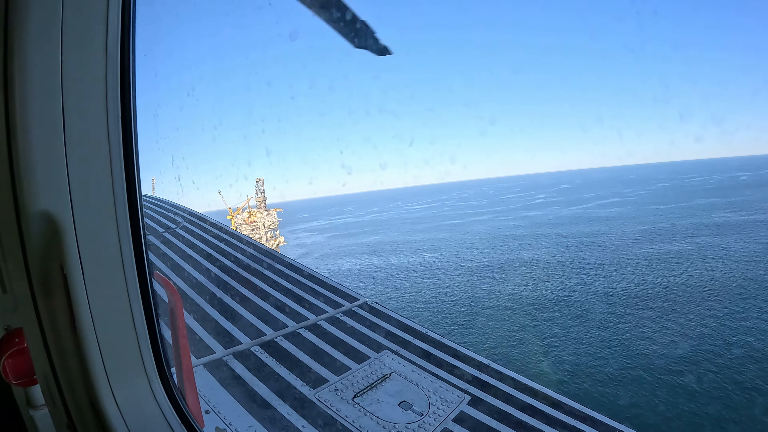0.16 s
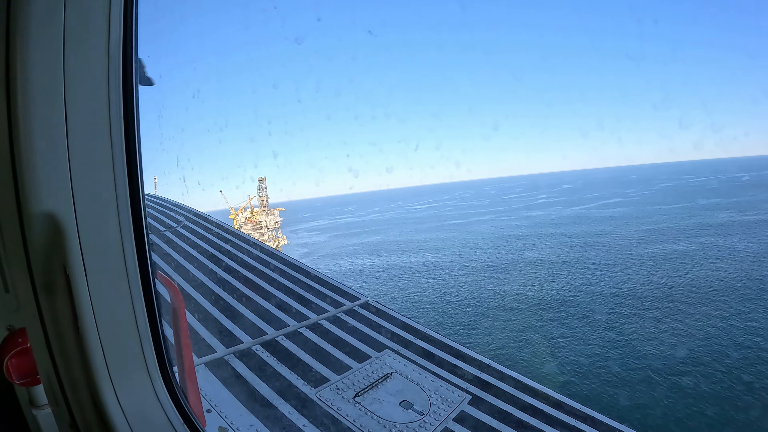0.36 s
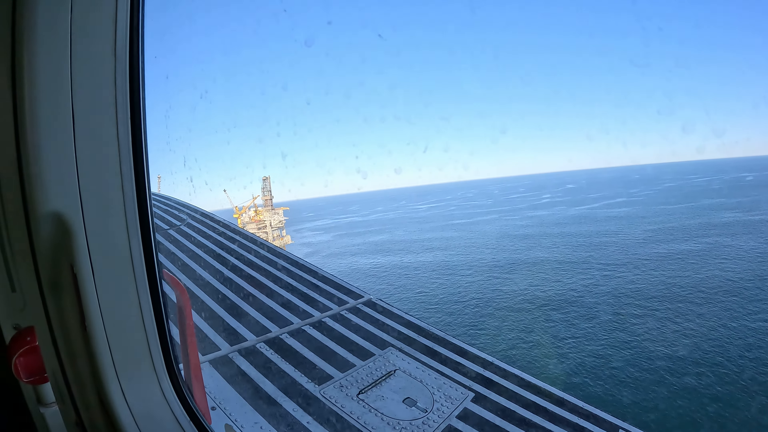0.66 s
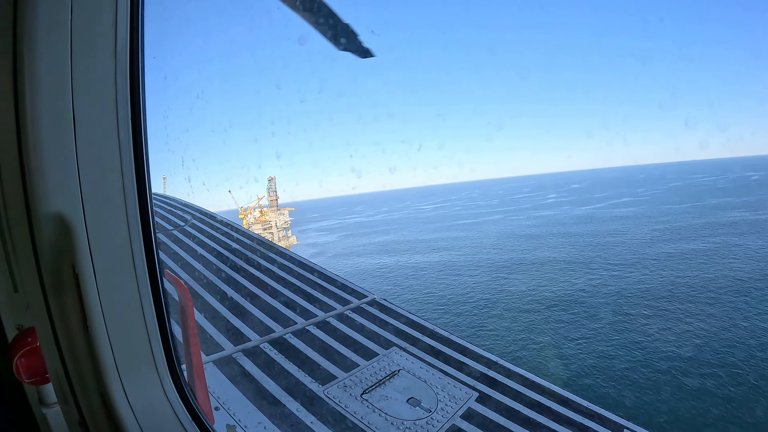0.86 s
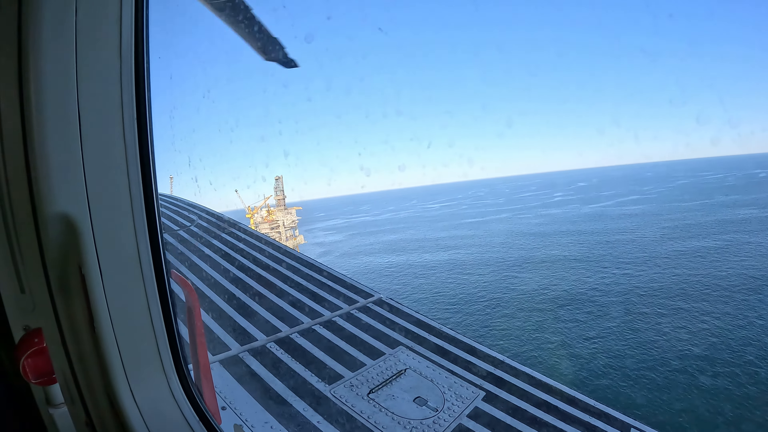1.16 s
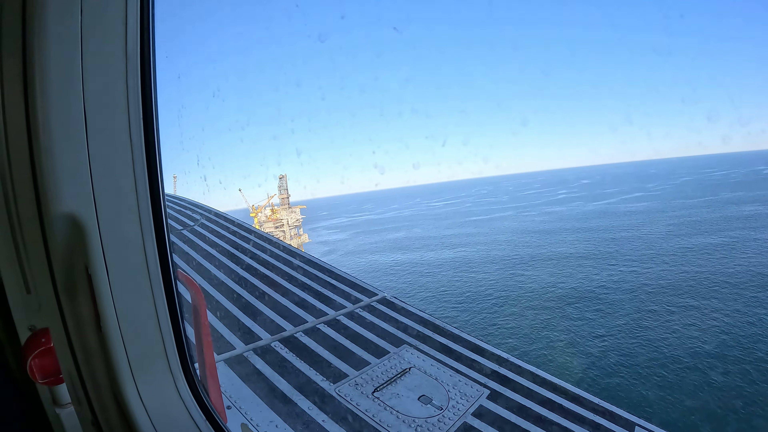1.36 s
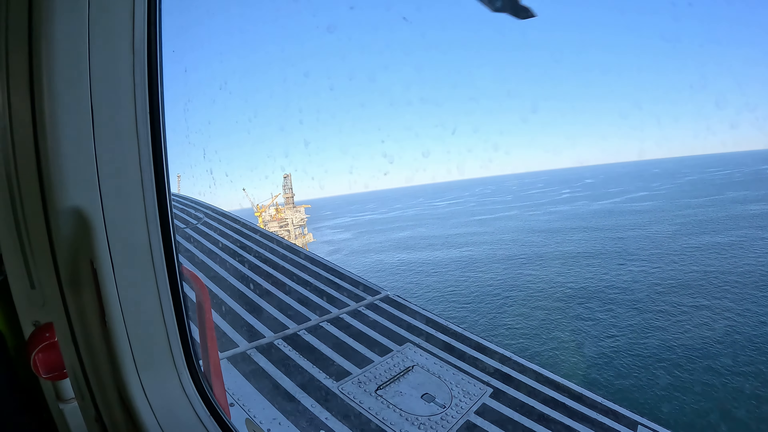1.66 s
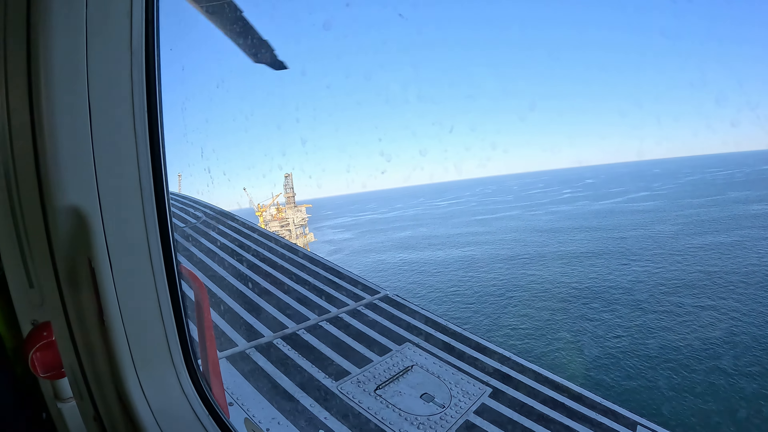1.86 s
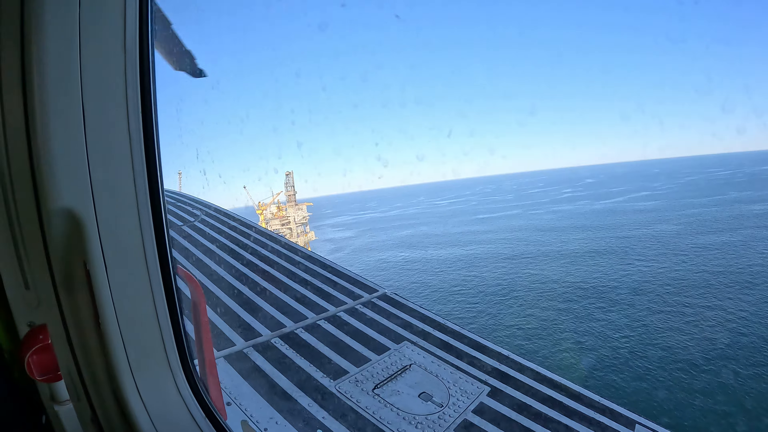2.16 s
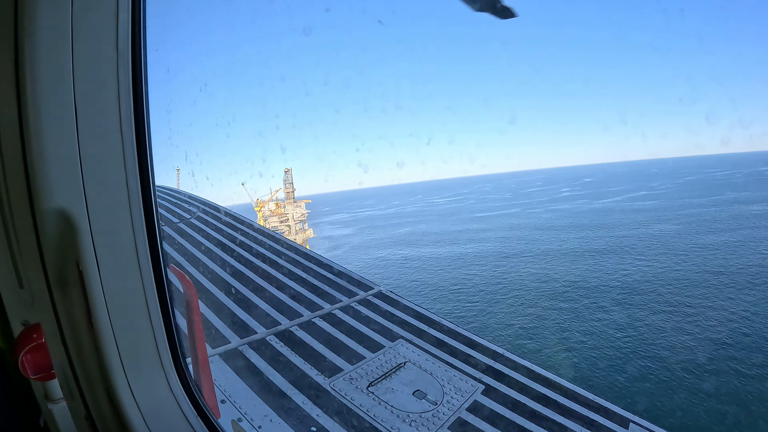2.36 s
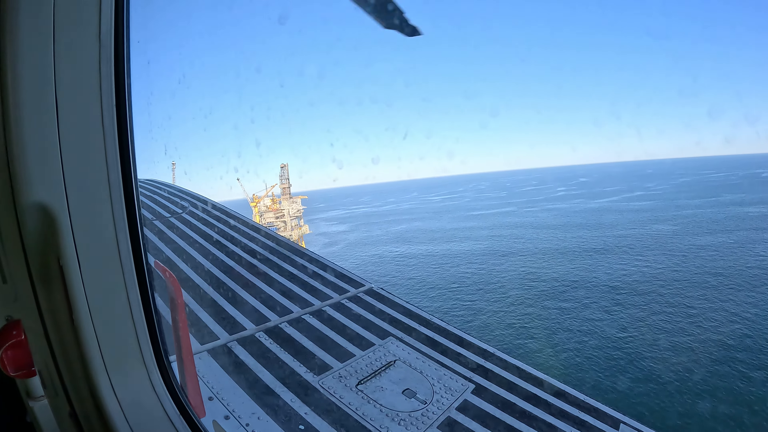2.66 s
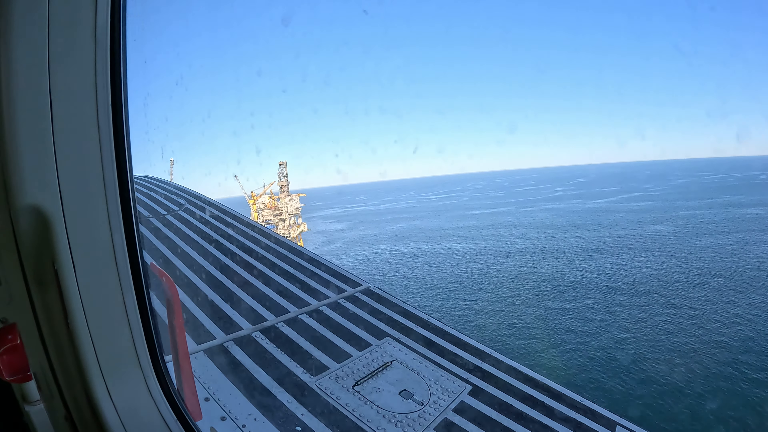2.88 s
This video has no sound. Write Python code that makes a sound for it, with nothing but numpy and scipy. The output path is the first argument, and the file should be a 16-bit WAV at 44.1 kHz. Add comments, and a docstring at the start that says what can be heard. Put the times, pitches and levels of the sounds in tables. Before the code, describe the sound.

A helicopter in steady flight, heard from inside the cabin. A deep, throbbing rotor hum and a broad engine roar run throughout, with quick, light blade swishes and gear whine. A faint, thin whistle creeps in about halfway.

```python
"""The rotors of a four-bladed helicopter in steady flight, heard from inside the cabin.
Main and tail rotor send pressure pulses through the hull, making a deep hum. Engines and airflow add a
broad roar, coloured by the cabin, and every passing blade lifts its treble in a short, gritty swish.
Gears whine and an engine whistles faintly above it. A gain control gently evens out the level."""
import sys
import numpy as np
from scipy import signal
from scipy.fft import rfft, irfft, next_fast_len
from scipy.io import wavfile

SR = 44100
rng = np.random.default_rng(int(sys.argv[2]) if len(sys.argv) > 2 else 0)


def pcm_store(signal):
    """Save signal as 16-bit PCM."""
    levels = np.round(np.clip(np.atleast_2d(signal), -1, 1) * 32767)
    wavfile.write(sys.argv[1], SR, levels.astype(np.int16).T)


N = 133182

ROTOR_HZ, BLADES, TAIL_BLADE_HZ = 4.2923, 4, 83.5
MAIN_DELAY_S, TAIL_DELAY_S, THROB_DELAY_S = .026, .00067, .0069
MISMATCH_SHARE, MISMATCH_TOP_HZ = .45, 260   # share of the low roar's power that repeats every turn
FIRST_SWISH_S, SWISH_HALF_S, SWISH_SPREAD_DB = .015, .005, 1.3
HOWL_HZ, HOWL_WIDTH_HZ = 956, 48
SQUEEZE, RELEASE_S, OUT_DB = .091, .03, .42   # gain control: SQUEEZE is the share of swing taken out
PEAK_LIMIT, CUTOFF_HZ = .9, 15700

# main rotor tones: (multiple of the turning rate, base level [dB])
MAIN_TONES = [(3, -41), (4, -22), (6, -35), (7, -36), (8, -29), (12, -25), (13, -35), (16, -30), (17, -32),
              (20, -28), (24, -32), (32, -25.5), (38, -35), (48, -39), (49, -40)]
# tail rotor tones: (multiple of its blade rate, base level [dB])
TAIL_TONES = [(1, -21), (2, -23.5), (3, -33), (4, -44)]
# slow rise and fall of the rotors' overtones: (time [s], main gain [dB], tail gain [dB])
HUM_GAINS = [(0, -3.5, 2), (.5, 0.5, 2), (.8, 0, -3.5), (1.4, 0, -1.6), (2.1, 0.5, -1.7), (2.5, -2.5, 1.5),
             (3.02, -2.5, 1)]
# the roar as the cabin colours it: (frequency [Hz], base level in a 1 Hz band [dB])
ROAR_SPECTRUM = [(8, -60), (14, -38), (24, -47), (33, -41), (44, -43.5), (70, -37), (95, -45), (120, -39.5),
                 (170, -43.5), (225, -47.5), (265, -44), (315, -45), (400, -49.5), (450, -54), (590, -50.5),
                 (720, -54), (790, -58.5), (880, -56), (965, -57), (1030, -55), (1090, -66.5),
                 (1400, -66.5), (1600, -71), (1800, -74), (2150, -70), (2500, -75.5), (2900, -72),
                 (3150, -72), (3420, -78), (3600, -79.5), (4300, -81), (4900, -82), (5500, -86),
                 (6100, -85), (6850, -85), (7500, -85.5), (8450, -86), (9000, -94.5), (10300, -93.5),
                 (11000, -99), (12600, -99), (13300, -106), (15000, -112), (16000, -125)]
# narrow peaks and dips in the roar: (frequency [Hz], width [Hz], gain [dB])
# it thins around the tail rotor's two lowest tones, so their drone sounds firm
ROAR_PEAKS_AND_DIPS = [(87, 16, -2), (164, 23, -2.5), (264, 12, -3.5), (398, 13, -1.5), (321, 35, 1.5),
                       (409, 17, 5.5), (547, 17, 0), (659, 11, 3.5), (698, 13, 2), (738, 13, -0.5),
                       (966, 21, 10), (2940, 75, -4), (3120, 63, 2.5), (3330, 84, 6), (3447, 48, 7),
                       (4300, 50, 3.5), (4400, 150, -3), (4840, 70, 4.5), (6580, 200, 3), (6920, 130, 4.5)]
# rise and fall of parts of the roar: (time [s], middle gain [dB], howl gain [dB], treble gain [dB])
ROAR_GAINS = [(0, 0.3, -0.5, -1.5), (.5, -1.5, -2.5, -1.5), (.98, 0.4, -1.5, 0.1), (1.08, -0.5, 3, -1),
              (1.16, 3.5, 1, -0.7), (1.3, 1, -2, 0.6), (1.9, 0, -1.5, 0.4), (2.44, -1, 2, 0.5),
              (2.52, 3.5, 5, -0.5), (2.6, 1.5, 1, 1), (2.72, 1.5, 4, 0.8), (2.82, 2.5, -3, 1.2),
              (3.02, -3.5, 4, .6)]
# throb of the roar at the tail blade rate: (frequency [Hz], depth [dB])
TAIL_THROB = [(2000, -1.4), (4000, 0.4), (7000, 1), (10000, 0.5)]
# change in the roar as a blade of strength 1 passes: (frequency [Hz], gain [dB])
SWISH_LIFT = [(400, 1.5), (800, -2), (2000, 0.5), (5000, 0.5), (7500, 1.7), (10000, 4.5), (13000, 3)]
# slow change in the strength of the swishes: (time [s], gain [dB])
SWISH_GAINS = [(0, -1.5), (.8, -1), (1.0, .5), (1.3, -1), (1.75, 1.5), (2.3, 1.5), (2.6, -1), (3.02, -.5)]
# gear and shaft whines: (frequency [Hz], level halfway through [dB], trend [dB/s])
GEAR_WHINES = [(365.3, -32.5, -1), (721.1, -35, -1.5), (755.2, -42, 0), (1331.5, -56, 0), (1416.3, -51, 0),
               (1515.1, -59, 0), (1954.3, -61, 0), (1980.3, -60, 0), (1991.0, -59, 0), (2110.9, -55, 0),
               (2191.5, -60, 0), (3121.0, -53.5, 1), (3938, -68.5, -2), (4233, -68, 1)]
# pitch of the engine whistle: (time [s], frequency [Hz])
WHISTLE_PITCH = [(0, 1723), (1.0, 1724), (1.5, 1731), (2.1, 1733), (2.65, 1739), (3.02, 1740.5)]
# tones of the whistle: (multiple of its pitch, full level [dB], entry time [s], flutter [dB])
WHISTLE_TONES = [(1, -57.5, 1.5, 1.5), (2, -54.5, 1.3, 1.0), (3, -59, 2.4, 1), (4, -67.5, 1.2, 6)]


def rotor_hum(tones, blade_hz, delay_s, overtone_db, waver_db=.5, smear_turns=.5):
    """Each blade sends out a pressure pulse; repeated quickly, the pulses are heard as low tones."""
    t = drive_time() - delay_s
    hum = 0
    for k, db in tones:
        level = np.sqrt(2) * from_db(db + (k > 1) * overtone_db + waver_db * drift(.86))
        shift = smear_turns * k * (k - 1) / 2   # the hull smears each pulse: high tones shift more
        hum += level * np.cos(2 * np.pi * (k * blade_hz * t + shift))
    return hum


def blade_mismatch():
    """No two blades are alike, so faint tones fill the gaps between the main rotor's strong ones."""
    strong = [k for k, db in MAIN_TONES]
    turns = ROTOR_HZ * drive_time()
    share = np.sqrt(2 * MISMATCH_SHARE * ROTOR_HZ)
    hum = 0
    for k in range(2, int(MISMATCH_TOP_HZ / ROTOR_HZ)):
        if k not in strong:
            level = share * from_db(roar_colour_db(k * ROTOR_HZ) + 2.9 * rng.standard_normal())
            hum += level * np.cos(2 * np.pi * (k * turns + rng.random()))
    return hum


def roar(passes, flicker_db=.5):
    """Engine and airflow noise swishes with the main blades, throbs with the tail and howls hollowly."""
    size = next_fast_len(N)
    hz = np.arange(size // 2 + 1) * SR / size + 1e-3
    noise = rfft(rng.standard_normal(size)) * from_db(roar_colour_db(hz)) * np.sqrt(SR / 2) * (hz > 4)
    noise *= np.sqrt(1 - MISMATCH_SHARE * (hz < MISMATCH_TOP_HZ))   # leave room for the mismatch tones
    mid_db, howl_db, treble_db = curves(ROAR_GAINS)
    throb = np.cos(2 * np.pi * TAIL_BLADE_HZ * (np.arange(N) / SR - THROB_DELAY_S))
    swish = passes - passes.mean()
    centres = 960 * 2 ** np.arange(-2, 4.5, .5)   # bands half an octave apart [Hz]
    place = np.interp(np.log(hz), np.log(centres), np.arange(len(centres)))
    bands = 0
    for k, centre in enumerate(centres):
        band = irfft(noise * np.clip(1 - abs(place - k), 0, 1), size)[:N]
        swing_db = mid_db if k in (2, 3) else treble_db if k > 8 else 0
        blade_db = at_hz(SWISH_LIFT, centre) * swish + at_hz(TAIL_THROB, centre) * throb
        bands += band * from_db(swing_db + blade_db + (k > 0) * flicker_db * drift(5.5))
    howl = irfft(noise * np.exp(-((hz - HOWL_HZ) / HOWL_WIDTH_HZ) ** 2), size)[:N]
    return bands + howl * (from_db(howl_db) - 1)


def roar_colour_db(hz):
    """The roar's base level at each pitch: a broad shape with narrow peaks and dips."""
    narrow_db = sum(db / (1 + (2 * (hz - at) / width) ** 2) for at, width, db in ROAR_PEAKS_AND_DIPS)
    return at_hz(ROAR_SPECTRUM, hz) + narrow_db


def blade_passes():
    """A smooth bump for each blade passing overhead, some stronger than others."""
    count = (np.arange(N) / SR - FIRST_SWISH_S) * ROTOR_HZ * BLADES
    nearest = np.round(count).astype(int)
    offset_s = (count - nearest) / (ROTOR_HZ * BLADES)
    strength = from_db(SWISH_SPREAD_DB * rng.standard_normal(64))
    swing = from_db(curves(SWISH_GAINS)[0])
    return swing * strength[nearest] * np.exp(-.5 * (offset_s / SWISH_HALF_S) ** 2)


def gear_whine(waver_db=1.6, wander_s=.00004):
    """Gears and shafts whine, all following the drive's slight wander; some fade, some grow."""
    t = drive_time() + wander_s * drift(.65)
    whine = 0
    for hz, db, db_per_s in GEAR_WHINES:
        level = np.sqrt(2) * from_db(db + db_per_s * (t - t.mean()) + waver_db * drift(1.0))
        whine += level * np.cos(2 * np.pi * (hz * t + rng.random()))
    return whine


def engine_whistle(swell_db=8, swell_s=.1):
    """A thin whistle creeps up as the engine gains speed; its tones swell in one after another."""
    t = np.arange(N) / SR
    turns = np.cumsum(curves(WHISTLE_PITCH)[0]) / SR + .053 * drift(1.3)
    whistle = 0
    for k, db, entry_s, flutter_db in WHISTLE_TONES:
        held_back_db = swell_db / (1 + np.exp((t - entry_s) / swell_s))
        level = np.sqrt(2) * from_db(db - held_back_db + flutter_db * drift(25))
        whistle += level * np.cos(2 * np.pi * (k * turns + rng.random()))
    return whistle


def swish_grit(passes, ticks_per_s=2500, gain_db=-52, hz=10000):
    """Tiny bright ticks crowd into each swish; a stronger swish holds more of them."""
    sizes = from_db(3 * np.minimum(rng.exponential(1, N), 3)) * rng.choice([-1, 1], N)
    ticks = sizes * (rng.random(N) < ticks_per_s * passes ** 2 / SR)
    bright = signal.butter(2, [hz * .95, hz * 1.27], "band", fs=SR, output="sos")
    return from_db(gain_db) * signal.sosfilt(bright, ticks + 1e-18)


def drive_time(overspeed=.002, settle_s=.3):
    """Time as the drive shaft counts it: it starts a touch fast, then settles."""
    t = np.arange(N) / SR
    return t - overspeed * settle_s * np.exp(-t / settle_s)


def drift(rate_hz):
    """A smooth random wobble, about 1 in size; a higher rate wobbles faster."""
    r = np.exp(-80 * np.pi * rate_hz / SR)
    slow = signal.lfilter([1], [1, -2 * r, r * r], rng.standard_normal(N // 40 + 4002))[4000:]
    return np.interp(np.arange(N) / 40, np.arange(len(slow)), slow / slow.std())


def curves(table):
    """Join a time table's points with straight lines, one curve for each value column."""
    times, *columns = np.transpose(table)
    return [np.interp(np.arange(N) / SR, times, column) for column in columns]


def at_hz(table, hz):
    """Read between the rows of a frequency table, with octaves evenly spaced."""
    frequencies, db = np.transpose(table)
    return np.interp(np.log(hz), np.log(frequencies), db)


def from_db(db):
    """Turn decibels into a factor to multiply by."""
    return 10 ** (np.asarray(db) / 20)


def scene():
    """All the sounds add up at one spot in the cabin."""
    passes = blade_passes()
    main_db, tail_db = curves(HUM_GAINS)
    main_tones = [(k / BLADES, db) for k, db in MAIN_TONES]   # as multiples of the blade rate
    main = rotor_hum(main_tones, ROTOR_HZ * BLADES, MAIN_DELAY_S, main_db)
    tail = rotor_hum(TAIL_TONES, TAIL_BLADE_HZ, TAIL_DELAY_S, tail_db)
    tones = main + tail + blade_mismatch() + gear_whine() + engine_whistle()
    return (tones + roar(passes) + swish_grit(passes))[None]


def record(dry):
    """A gain control evens the level a little, peaks are rounded and the highest treble is cut."""
    r = np.exp(-1 / (RELEASE_S * SR))
    mean_power = np.mean(dry ** 2)
    power = signal.lfilter([1 - r], [1, -r], dry ** 2 - mean_power) + mean_power
    gain = (np.maximum(power, 1e-9) / mean_power) ** (-SQUEEZE / 2) * from_db(OUT_DB)
    rounded = PEAK_LIMIT * np.tanh(dry * gain / PEAK_LIMIT)
    return signal.sosfilt(signal.cheby2(12, 70, CUTOFF_HZ, fs=SR, output="sos"), rounded)


dry = scene()
out = record(dry)
pcm_store(out)
```